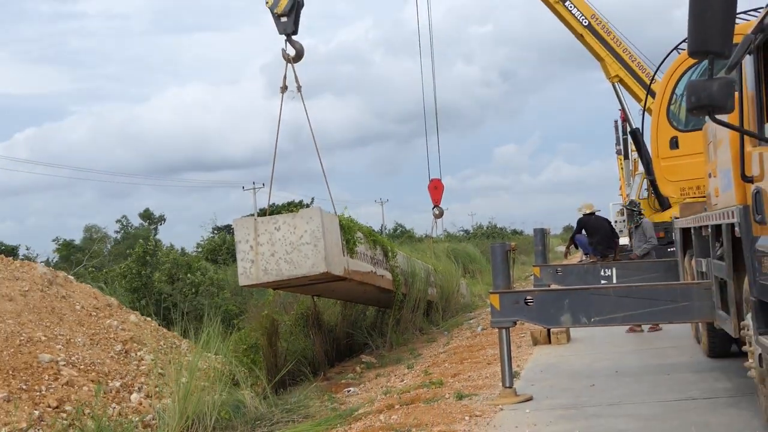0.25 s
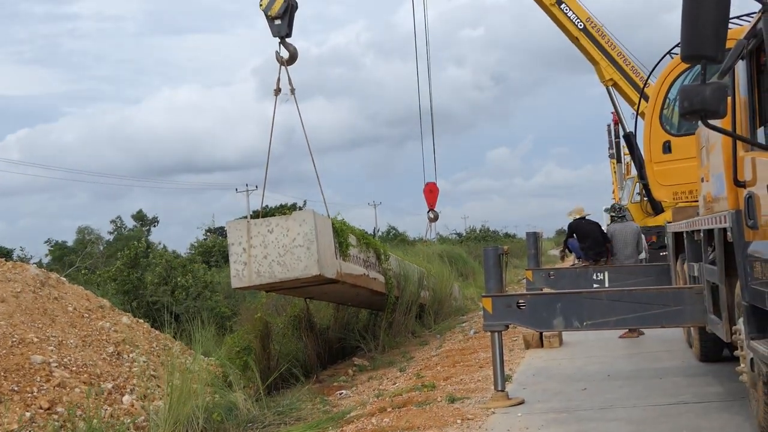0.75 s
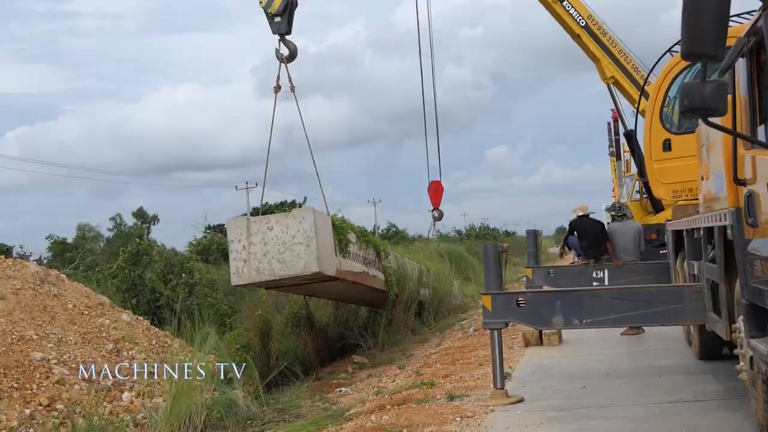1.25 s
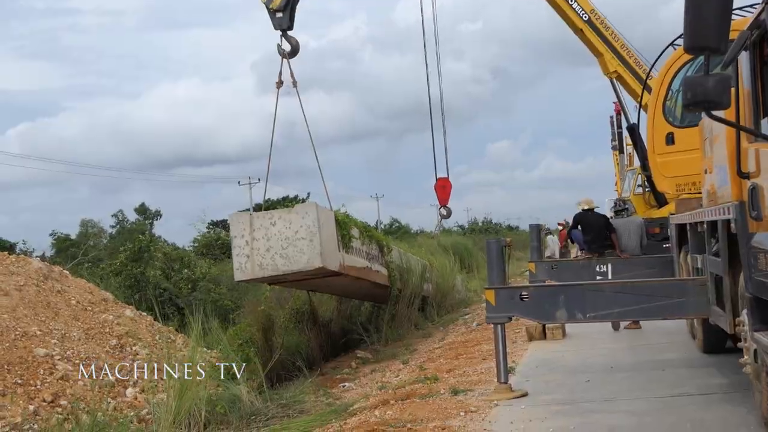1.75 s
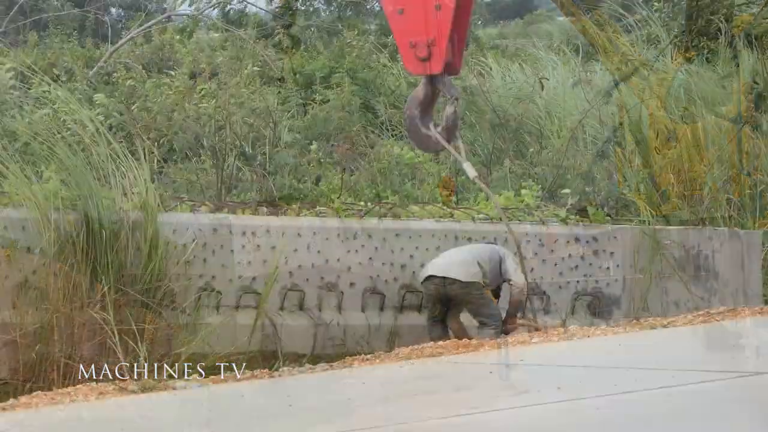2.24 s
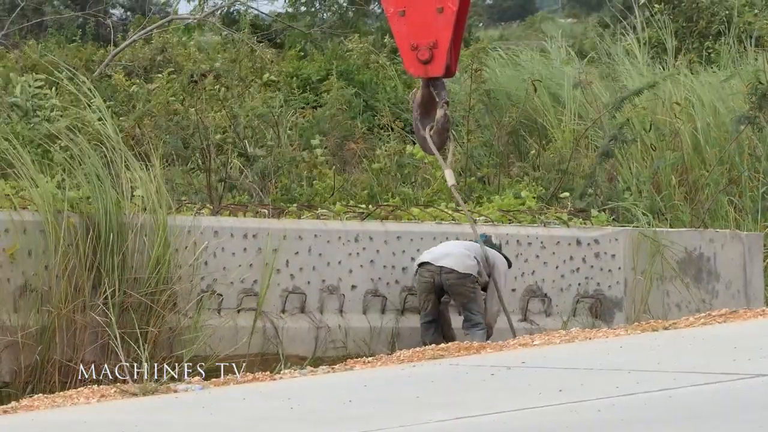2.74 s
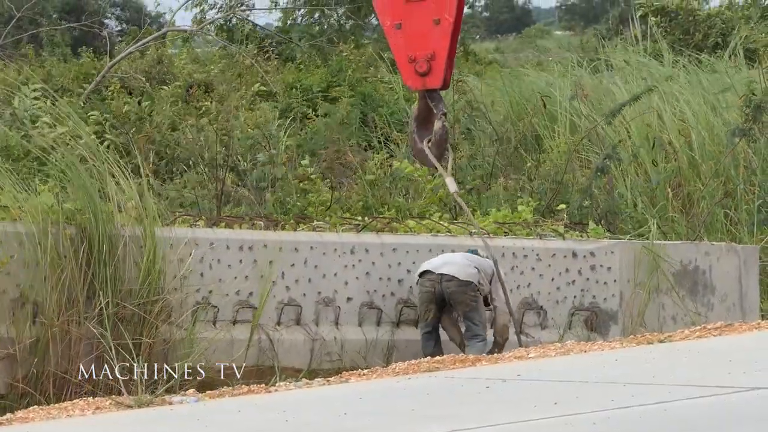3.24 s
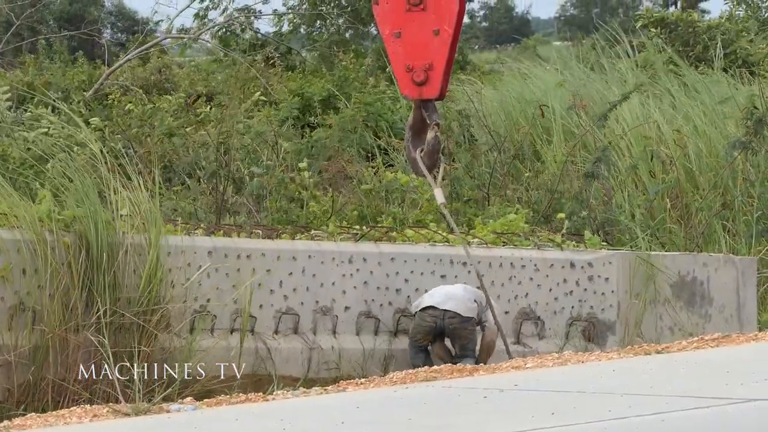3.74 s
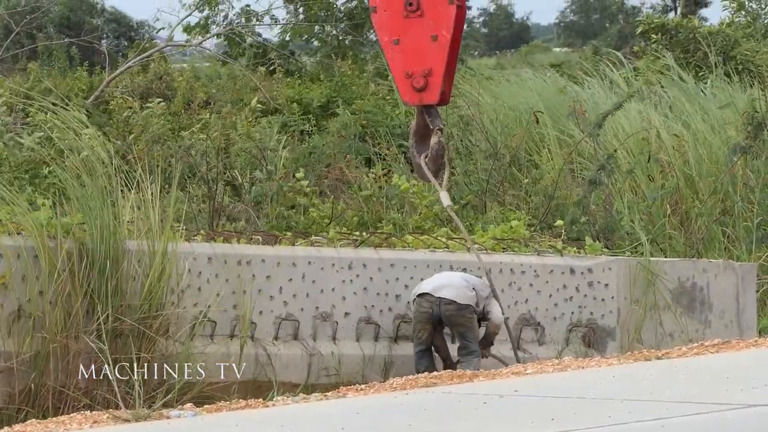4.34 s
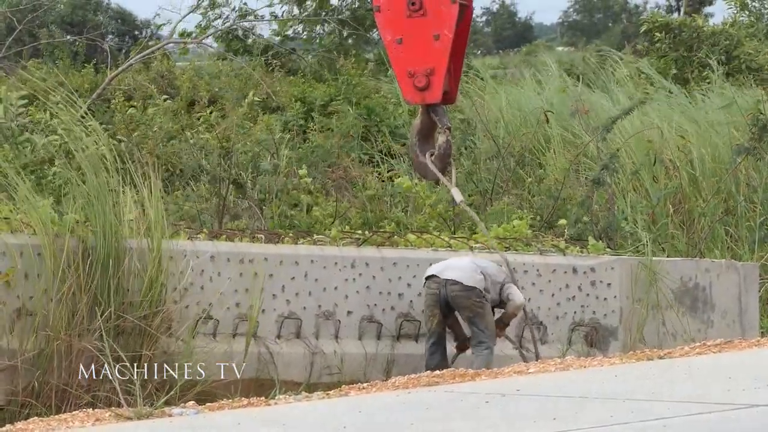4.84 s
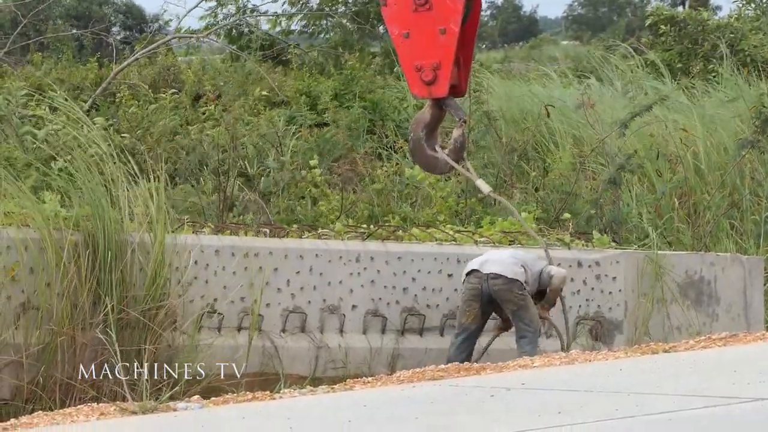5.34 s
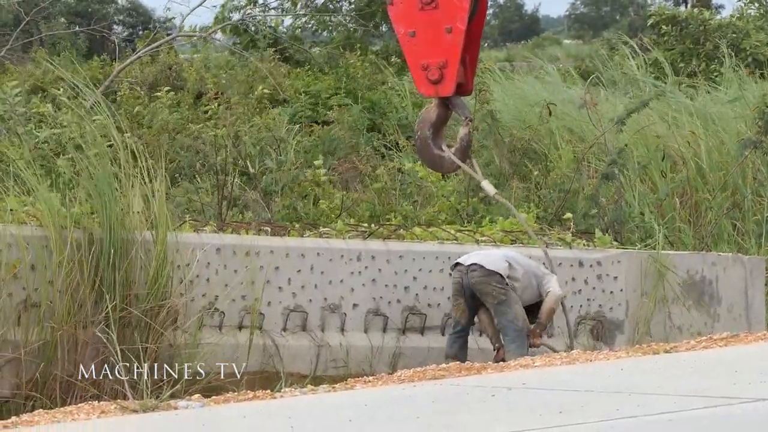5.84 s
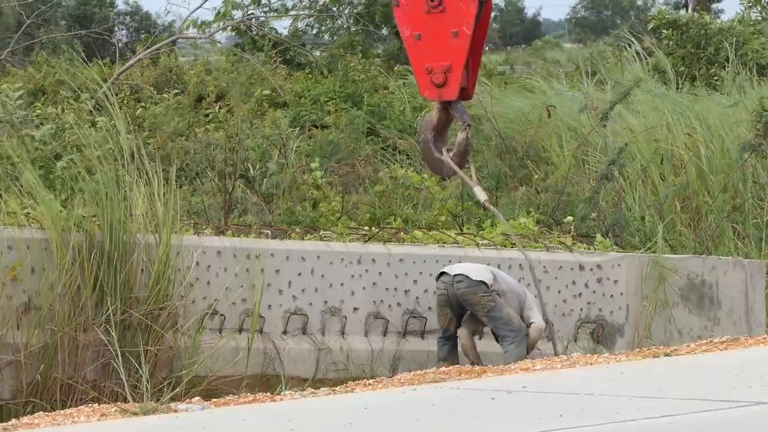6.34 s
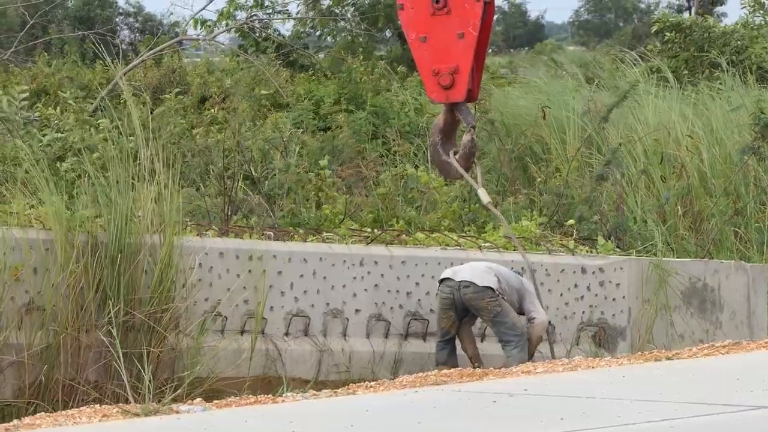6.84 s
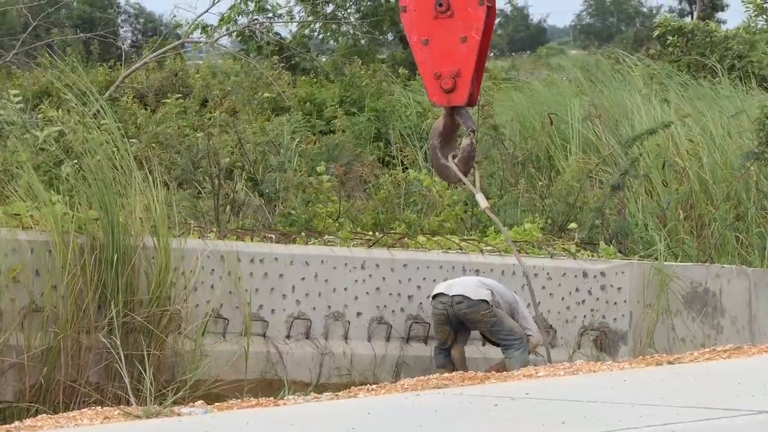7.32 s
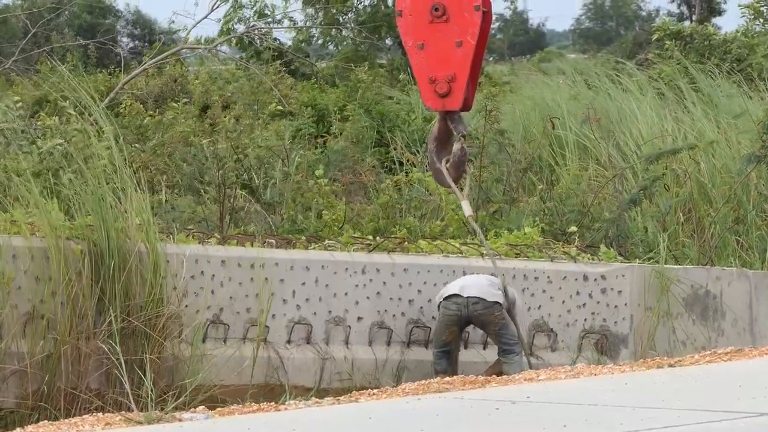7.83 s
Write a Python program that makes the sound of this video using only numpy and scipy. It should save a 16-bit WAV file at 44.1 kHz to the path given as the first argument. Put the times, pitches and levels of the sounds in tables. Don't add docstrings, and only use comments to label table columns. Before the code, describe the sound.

Outdoors at a building site, a heavy crane diesel runs close by, with low fan roar, fast hard clatter and a thin whine. After two seconds everything drops to silence briefly. Then a slower engine idles farther off, throbbing and ticking, with a hum and hissing belts. Faint steel-rope scuffs come and go; near the end a hook scrapes on concrete, knocks and bounces.

```python
import sys
import numpy as np
from scipy import signal
from scipy.fft import rfft, irfft, next_fast_len
from scipy.io import wavfile
from scipy.ndimage import uniform_filter1d, map_coordinates

SR = 44100
rng = np.random.default_rng(int(sys.argv[2]) if len(sys.argv) > 2 else 0)


def ratio(d):
    e = np.asarray(d, float) / 20
    return 10 ** e


def unload_wav(signal):
    wavfile.write(
        sys.argv[1],
        SR,
        np.round(np.clip(np.atleast_2d(signal).T, -1, 1) * 32767).astype(np.int16),
    )


N = 356328
T = np.arange(N) / SR

# start_s, end_s
PAUSE = (2.124, 2.377)
NEAR_TURN_HZ = 13.3314
FAR_CYCLE_HZ = 4.10704


def unit(x):
    return x / np.sqrt(np.mean(x ** 2) + 1e-20)


def along(points, hz):
    f, v = np.transpose(points)
    return np.interp(np.log(hz + 1), np.log(f + 1), v)


def wobble(rate, step=1):
    coarse = T[::step]
    knots = rng.standard_normal(int(N * rate / SR) + 4)
    return np.interp(T, coarse, map_coordinates(knots, [coarse * rate]))


def filtered(x, response):
    m = next_fast_len(N + SR // 2)
    return irfft(rfft(x, m) * response(np.fft.rfftfreq(m, 1 / SR)), m)[..., :N]


def resonant(x, modes):
    def response(f):
        total = 0
        for k, (centre, width, db) in enumerate(modes):
            damping = 1j * f * width
            total = total + (-1) ** k * ratio(db) * damping / (centre * centre - f * f + damping)
        return total
    return filtered(x, response)


def train(hz, shares, db, jitter_s, scatter_db):
    chance = rng.standard_normal((int(N / SR * hz) + 1, len(shares), 2))
    s = (np.arange(len(chance))[:, None] + shares) / hz + jitter_s * chance[..., 0]
    at = np.clip(np.round(s * SR), 0, N).astype(int).ravel()
    strength = ratio(db + scatter_db * chance[..., 1]).ravel()
    return np.bincount(at, strength, N + 1)[:N]


def dying(x, t60, grain=1):
    t = T[:SR // 4]
    decay = grain * ratio(-60 * t / t60)[None]
    return signal.fftconvolve(np.atleast_2d(x), decay, axes=1)[:, :N]


def paired(two, spectrum, pair):
    alike, balance, lead = pair

    def turn(hz):
        return np.arccos(np.clip(along(alike, hz), -1, 1)) / 2

    def half(hz):
        return along(balance, hz) * np.log(10) / 40 + .5j * np.interp(hz, *np.transpose(lead))

    mid, side = filtered(two, lambda hz: ratio(along(spectrum, hz)) * [np.cos(turn(hz)), np.sin(turn(hz))])
    ears = filtered(np.array([mid + side, mid - side]), lambda hz: np.exp([half(hz), -half(hz)]))
    return ears / np.std(ears.mean(0))


def tones(lines, drift, sway_db, pair):
    _, balance, lead = pair
    out = np.zeros((2, N))
    side = np.array([[.5], [-.5]])
    for hz, db in lines:
        phase = 2 * np.pi * hz * T + drift * wobble(4, step=200) + rng.uniform(0, 2 * np.pi)
        level_db = db + sway_db * wobble(6, step=200) + side * along(balance, hz)
        lag = side * np.interp(hz, *np.transpose(lead))
        out += np.sqrt(2) * ratio(level_db) * np.sin(phase + lag)
    return out


def multiples(base_hz, rows):
    return [(k * base_hz, db) for k, db in rows]


def near_engine():
    # pitch_hz, level_db (per Hz)
    body_colour = [(15, -66), (25, -36), (102, -23), (157, -10), (420, -5.5), (480, -4.5), (565, -3),
                   (610, -6), (716, -2.5), (889, -12.5), (967, -14.5), (1050, -17), (1260, -21.5),
                   (1350, -26.5), (1760, -49), (2970, -120)]
    # pitch_hz, level_db (per Hz)
    clatter_colour = [(710, -40), (1200, -18), (1400, -5.5), (1610, -2), (2320, -5), (3060, -12),
                      (4280, -7), (4870, -14), (6040, -10), (7100, -20.5), (8080, -14.5), (9000, -19.5),
                      (11900, -16.5), (13800, -20), (15800, -29)]
    # share_of_turn, level_db
    knocks = [(.0, 6), (.13, 1), (0.331, 7), (.52, -21), (.77, 11)]
    # (pitch_hz, left_over_right_db)
    width = [
        [(60, -0.5), (110, 0.9), (200, 0.6), (700, 0.96), (1290, 0.65), (2380, 0.73), (4400, 0.65), (12000, 0.87)],
        [(60, 5), (110, -2), (200, -0.5), (700, 0), (1290, -2.0), (2380, -7), (4400, -5.5), (15000, -0.5)],
    ]
    # pitch_hz, phase_radians
    lead = [(0, 0), (1400, 0), (3100, -1), (3360, .8), (4740, -.5), (5510, .6), (6550, -.4), (7490, .3)]
    # multiple_of_tooth_rate, level_db (rms)
    pump = [(3, -37), (6, -34.5), (10, -43.5), (14, -48.5), (18, -54), (23, -53), (32, -58)]
    # multiple_of_fan_tone, level_db (rms)
    fan = [(1, -41), (2, -48)]
    # multiple_of_turn_rate, level_db (rms)
    gears = [(18, -52), (20.5, -48), (27, -48), (28, -46.5), (30, -47), (39, -46), (42, -48), (60, -50),
             (148, -47.5), (160, -50), (177, -46.5), (250, -53), (254, -54), (285, -54), (297, -52),
             (318, -52), (331.5, -54), (340, -55), (344, -54), (436, -57), (461, -56), (494, -60),
             (384, -58), (394, -59), (397, -58), (476, -58), (560, -64), (582.7, -63), (602, -62),
             (780, -64), (840, -63), (895, -64)]
    pair = (*width, lead)

    contacts = rng.uniform(0, 1, (40, 2))
    grain = rng.standard_normal((2, 2, SR // 4))
    touches = train(NEAR_TURN_HZ, contacts[:, 0], 6 * contacts[:, 1], jitter_s=.00003, scatter_db=1.5)
    rattle = unit(dying(touches, .03, grain[0]))
    bangs = train(3 * NEAR_TURN_HZ, contacts[:5, 1], 0, jitter_s=.00002, scatter_db=1.5)
    firing = unit(dying(bangs, .05, grain[1]))
    roar = rng.standard_normal((2, 2, N))
    body = paired(roar[0] * ratio(.8 * wobble(15)) + .45 * rattle + .25 * firing, body_colour, pair)

    share, db = np.transpose(knocks)
    swell = 2.5 + 0.45 * dying(train(NEAR_TURN_HZ, share, db, jitter_s=0.00038, scatter_db=1.5), 0.09)
    ripple_db, spacing_hz, lowest_hz = 2.2, 45, 4000
    knots = rng.standard_normal(SR // spacing_hz)

    def panels(hz):
        return ratio(ripple_db * (hz > lowest_hz) * map_coordinates(knots, [hz / spacing_hz]))

    bright = filtered(swell * roar[1] + .55 * rattle + .45 * firing, panels)
    clatter = paired(bright, clatter_colour, pair)
    whines = (multiples(12 * NEAR_TURN_HZ, pump) + multiples(52.5 * NEAR_TURN_HZ, fan)
              + multiples(NEAR_TURN_HZ, gears))
    return ratio(-27) * body + ratio(-28) * clatter + tones(whines, drift=0.37, sway_db=1.0, pair=pair)


def far_engine():
    # pitch_hz, level_db (per Hz)
    body_colour = [(13, -56), (22, -36), (60, -16), (113, -5), (180, -5), (250, -2.5), (300, -5), (361, -7),
                   (452, -11), (490, -11.5), (530, -12.5), (711, -12), (775, -13.5), (907, -12.5),
                   (1400, -27.5), (1820, -37), (3080, -120)]
    # pitch_hz, level_db (per Hz)
    clatter_colour = [(710, -24.5), (1200, -2), (2080, -5.5), (2310, -5.5), (2650, -6), (2850, -9),
                      (3070, -8.5), (3920, -13.5), (4690, -11), (5730, -9), (6500, -12.5), (7000, -18.5),
                      (7900, -23), (9420, -19), (12000, -28), (12300, -26), (12800, -29.5), (14100, -24),
                      (15000, -29)]
    # share_of_cycle, exhaust_db, tappet_db
    firings = [(.005, 0, -2), (.14, 0, -9), (.265, 1, -4), (.405, 1, -18), (.53, -2, -14), (.63, 1, -7),
               (.76, 0, -5), (.88, -1, -2)]
    # (pitch_hz, left_over_right_db)
    width = [
        [(60, 0.81), (110, 0.9), (380, 0.81), (700, 0.76), (1290, 0.36), (2380, 0.52), (8120, 0.93), (15000, 0.14)],
        [(60, -1), (200, 0.0), (700, 3.5), (1290, 9), (2380, 8), (4400, 4), (8120, 2), (15000, -1.5)],
    ]
    # pitch_hz, phase_radians
    lead = [(0, 0), (860, .9), (2240, -.4), (3100, .2), (4740, -.5), (6630, .2), (7920, -1.2), (12600, -.9)]
    # first_hz, second_hz
    belt_hz = (61.57, 74.78)
    # pitch_hz, width_hz, level_db
    squeal_band = [(5760, 160, 0)]
    # pitch_hz, level_db (rms)
    own_hum = [(116.8, -50), (123, -47), (129, -46), (136.3, -52), (198, -45), (245.6, -45), (272.9, -44.5),
               (306.2, -52), (334.4, -44), (368.3, -52), (736.7, -47.5)]
    # multiple_of_cycle_rate, level_db (rms)
    idle = [(9, -60), (17, -49), (18, -51.5), (22, -52), (24, -46.5), (27, -53), (29, -52), (40, -42),
            (40.5, -50), (50, -50.5), (54, -46), (56, -50.5), (62, -51), (80, -49), (108, -53), (118, -48),
            (124, -59), (129, -56), (130, -58), (131, -55), (146, -58)]
    # multiple_of_turn_rate, level_db (rms)
    distant = [(3, -63), (4, -61), (8, -54), (12, -47), (17.5, -45), (21, -48), (24, -50), (36, -47),
               (41, -56), (42, -57), (48, -57)]
    pair = (*width, lead)

    hunt_db = 0.2 * wobble(1.4)
    share, exhaust_db, tappet_db = np.transpose(firings)
    puffs = train(FAR_CYCLE_HZ, share, exhaust_db, jitter_s=0.00034, scatter_db=-2.5)
    throb = unit(resonant(puffs, [(79.5, 31, -3.5), (128, 65, 1), (252, 180, -8)]))
    noise = rng.standard_normal((2, 2, N))
    taps = train(FAR_CYCLE_HZ, share, tappet_db, jitter_s=.001, scatter_db=1.2)

    casing = filtered(noise[0], lambda hz: 1 / (1 + (550 / (hz + 1)) ** 4))
    puffing = noise[0] * (1 + .3 * dying(puffs, .08)) * ratio(.6 * wobble(12))
    rumble = paired(puffing + .8 * casing * dying(taps ** .6, .11), body_colour, pair)

    first, second = [np.cos(2 * np.pi * hz * T) for hz in belt_hz]
    flutter = (1 + .18 * first) * (1 + .13 * second)
    belts = filtered(noise[1], lambda hz: 1 / (1 + ((hz - 5800) / 1300) ** 6))
    ticking = (noise[1] - belts) * (1 + .8 * dying(taps, .13))
    fluttering = flutter * belts * (1 + .4 * dying(taps ** .4, .12))
    hiss = (ticking + fluttering) * ratio(.35 * wobble(5))
    squeal = unit(resonant(hiss, squeal_band)) * ratio([[1.5], [-1.5]])

    hum = own_hum + multiples(FAR_CYCLE_HZ, idle) + multiples(NEAR_TURN_HZ, distant)
    return (ratio(-29.5 + hunt_db) * rumble + ratio(-42.5) * throb
            + ratio(-37 + hunt_db) * paired(hiss, clatter_colour, pair)
            + ratio(-56) * squeal + tones(hum, drift=.2, sway_db=1.2, pair=pair))


def tappets():
    # pitch_hz, level_db (rms), t60_s
    ringers = [
        (2345, -50, .045),
        (2600, -53, .02),
        (2865, -51, .07),
    ]
    # share_of_cycle, level_db
    blow_times = [
        [(.283, -1), (.895, 0), (.77, -10), (.16, -8), (.03, -10)],
        [(.015, -1), (.265, -1), (.625, -7), (.77, -7), (.885, -2)],
        [(.89, 0), (.755, -10), (.0, -6), (.625, -13)],
    ]
    out, t = np.zeros((2, N)), T[:SR // 5]
    for (hz, db, t60), struck in zip(ringers, blow_times):
        share, blow_db = np.transpose(struck)
        blows = train(FAR_CYCLE_HZ, share, blow_db, jitter_s=.001, scatter_db=1.1)
        ring = ratio(-60 * t / t60) * (1 - np.exp(-t / .009)) * np.sin(2 * np.pi * hz * t)
        puff = blows + .03 * dying(blows, .08) * rng.standard_normal((2, N))
        out += ratio(db) * unit(signal.fftconvolve(puff, ring[None], axes=1)[:, :N])
    return out * ratio([[3], [-4]])


def hook():
    # start_s, ring_peak_db, crack_db
    hits = [(7.3003, -13, -30), (7.311, -20, -24), (7.3152, -15, -32), (7.319, -20, -19), (7.333, -18, -30),
            (7.389, -8, -14), (7.4315, -13, -42), (7.435, -35, -38), (7.4405, -17, -38), (7.489, -22, -40),
            (7.5205, -19, -42), (7.574, -24, -40), (7.613, -32, -40)]
    # pitch_hz, width_hz, level_db
    contact = [(1000, 750, 0)]
    # pitch_hz, width_hz, level_db
    hook_modes = [(650, 40, 4), (780, 120, -6), (990, 45, 2), (2840, 300, -6), (1050, 600, 0)]
    # start_s, peak_db, pitch_hz, t60_s
    ground = [(3.942, -12, 290, 0.05), (7.278, -19, 260, .07), (7.304, -17.5, 200, 0.1),
              (7.318, -20, 340, .07), (7.335, -18, 150, 0.14), (7.347, -20, 300, .07)]
    seat_s = .001
    pushes, cracks, t = np.zeros((2, N + SR)), np.zeros(N + SR), T[:SR // 4]
    shove = ratio(-60 * t / .004)
    pushes[1, :len(t)] = shove
    for s, db, crack_db in hits:
        tail = .17 * ratio(-60 * t / .06) + .05 * ratio(-60 * t / .35)
        chatter = tail * (1 - np.exp(-t / .003)) * rng.standard_normal(len(t))
        pushes[0, round((s + seat_s) * SR):][:len(t)] += ratio(db) * (shove + chatter)
        crack = ratio(crack_db + 9 - 60 * t / .009) * rng.standard_normal(len(t))
        cracks[round(s * SR):][:len(t)] += crack
    ring, clean = resonant(resonant(pushes[:, :N], contact), hook_modes)
    dull_cracks = signal.lfilter(*signal.butter(2, [1400, 3800], "band", fs=SR), cracks[:N])
    blows = ring / abs(clean).max() + dull_cracks

    thumps = np.zeros(N)
    for s, db, hz, t60 in ground:
        since = np.clip(T - s, 0, 1)
        thumps += ratio(db - 60 * since / t60) * (1 - np.exp(-since / .0015)) * np.sin(2 * np.pi * hz * since)
    return blows * ratio([[3], [-4.5]]) + thumps


def scrape():
    # start_s, peak_db
    jerks = [(7.272, -26), (7.285, -23.5), (7.3, -26), (7.305, -28), (7.31, -17.5), (7.316, -20.5),
             (7.323, -25), (7.336, -35), (7.341, -31), (7.348, -30), (7.355, -32)]
    # pitch_hz, level_db (per Hz)
    grit_colour = [(47, -39), (80, -18), (226, 8), (411, 1), (479, -25), (639, 11), (1160, -8), (1450, 4),
                   (2300, -4), (3500, -10), (4000, -23), (9900, -18), (15800, -29)]
    # pitch_hz, width_hz, level_db
    block = [(645, 130, 2.5), (945, 220, -11), (1440, 160, -2), (2470, 500, -5.5), (3360, 400, -3.5),
             (5600, 760, -4), (9500, 2000, -15), (12400, 900, -17.5)]
    rise_s, t60_s = 0.0046, 0.061
    stroke = np.zeros(N)
    for s, db in jerks:
        since = np.clip(T - s, 0, 1)
        stroke += ratio(db - 60 * since / t60_s) * np.clip(since / rise_s, 0, 1)
    grains = rng.standard_normal((2, N)) * ratio(2 * wobble(900))
    pair = ([(100, 0.55), (5000, 0.31)], [(100, 2.1), (2000, 24.0), (10000, 3)], [(100, 0)])
    plain = paired(grains, grit_colour, pair)
    ringing = unit(resonant(grains[0], block)) * ratio([[2.4], [-3.5]])
    return stroke * (.8 * plain + .7 * ringing)


def sling():
    # start_s, level_db, length_s, strand_pitch_hz, strand_over_grit_db
    scuffs = [(2.755, -56, .015, 9500, 0), (3.415, -56, .02, 9500, 0), (3.921, -43, .012, 7500, 1),
              (3.964, -47, .01, 7100, 3), (3.972, -40, 0.028, 7400, 2.5), (3.974, -50, .02, 10800, 5),
              (3.985, -41.5, 0.031, 5500, -3), (4.05, -53, .008, 9500, 6), (4.09, -56, .012, 6500, 10),
              (4.108, -48, .018, 9800, -4), (4.139, -43, 0.014, 7500, 2), (4.141, -59, .012, 12400, 6),
              (4.199, -52, .012, 9800, 2), (4.228, -44, .01, 7500, 4), (4.229, -54, .008, 10200, 9),
              (4.24, -55, .008, 7500, 6), (4.385, -52, .015, 9000, 0), (4.818, -54, .012, 5000, 14),
              (4.884, -48, 0.014, 4750, 14.5), (4.879, -56, .014, 9670, 16), (5.175, -48, 0.023, 6300, 4),
              (5.262, -49, .015, 5770, 11), (7.27, -38, .009, 5600, 6)]
    # pitch_hz, width_hz, level_db
    rope_modes = [(5260, 1000, 4), (7500, 1700, -1), (9800, 1500, -2), (12300, 1200, -27)]
    grit = unit(resonant(rng.standard_normal((2, N)), rope_modes))
    out, t = np.zeros((2, N)), T[:SR // 20]
    for s, db, length, hz, strand_db in scuffs:
        at = round(s * SR)
        unsteady = np.cumsum(rng.normal(0, .16, len(t)))
        strand = ratio(strand_db) * np.sin(2 * np.pi * hz * t + unsteady)
        middle, sides = grit[:, at:at + len(t)]
        rope = middle + strand + 0.62 * sides * np.array([[1], [-1]])
        swell = np.sin(np.pi * np.clip(t / length, 0, 1) ** 0.51)
        out[:, at:at + len(t)] += ratio(db) * swell * rope
    return out * ratio([[2.1], [.9]])


def scene():
    change_s = sum(PAUSE) / 2
    near = near_engine()
    far = far_engine() + tappets() + sling() + scrape() + hook()
    return (T < change_s) * near + (T > change_s) * far


def thin_treble(dry):
    # pitch_hz, threshold_db (from usual)
    sparse = [(6000, -9), (8500, -5), (11000, -2.2), (12300, -2.4), (12750, .6), (13200, -1.4), (14500, .3),
              (15200, 3.5), (15750, 4.5), (15850, 60)]
    lead = 65
    hz, _, z = signal.stft(np.pad(dry, ((0, 0), (lead, 0))), SR, window="cosine", nperseg=2048)
    band = np.arange(len(hz)) // 11
    power = uniform_filter1d(abs(z) ** 2, size=25, axis=1).mean(0)
    level_db = 10 * np.log10(power + 1e-20)
    above_db = level_db - np.median(level_db, axis=1, keepdims=True)
    band_luck = unit(uniform_filter1d(rng.standard_normal((band[-1] + 1, z.shape[2])), size=2, axis=1))
    luck_db = 2.7 * band_luck + .9 * rng.standard_normal(z.shape[2])
    kept = .45 * above_db + luck_db[band] > along([(3000, -30)] + sparse, hz)[:, None]
    return signal.istft(z * kept, SR, window="cosine", nperseg=2048)[1][:, lead:][:, :N]


def band_limit(x):
    return signal.sosfilt(signal.butter(12, 15900, fs=SR, output="sos"), x)


def record(dry):
    open_gate = uniform_filter1d(1. * ((T < PAUSE[0]) | (T > PAUSE[1])), size=60)
    return band_limit(open_gate * thin_treble(dry))


dry = scene()
out = record(dry)
unload_wav(out)
```